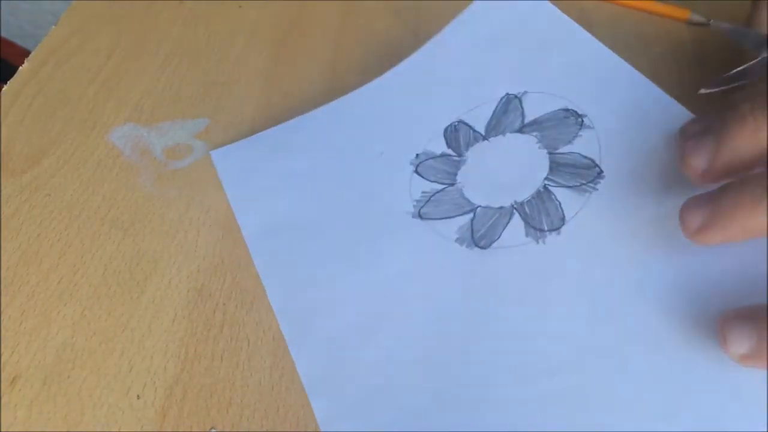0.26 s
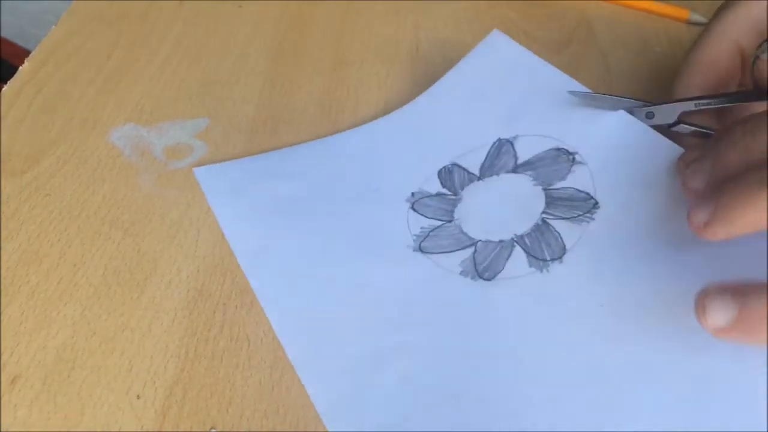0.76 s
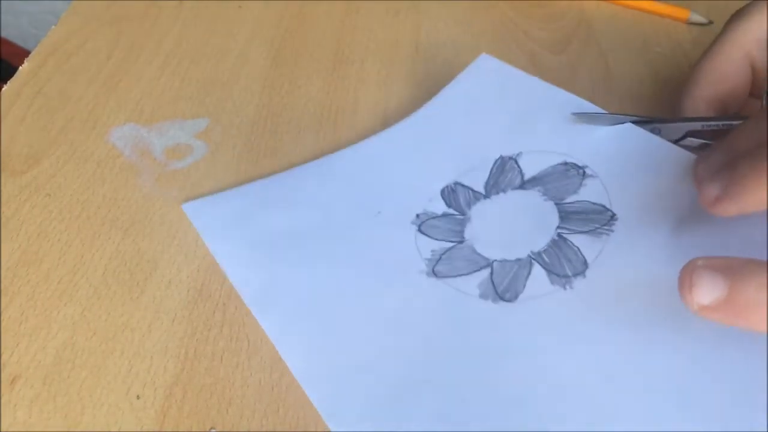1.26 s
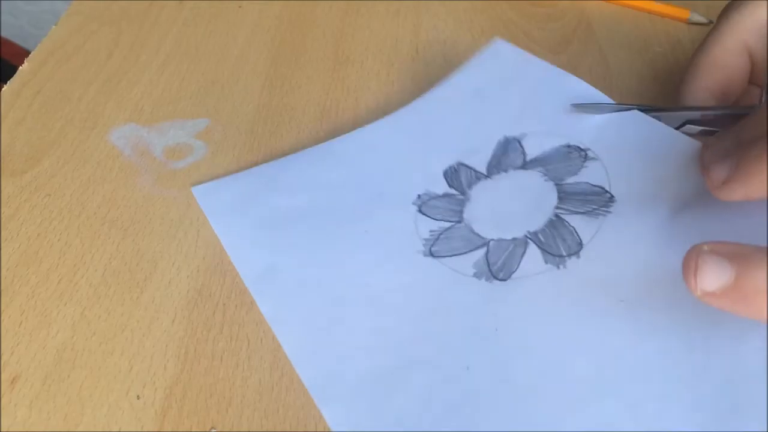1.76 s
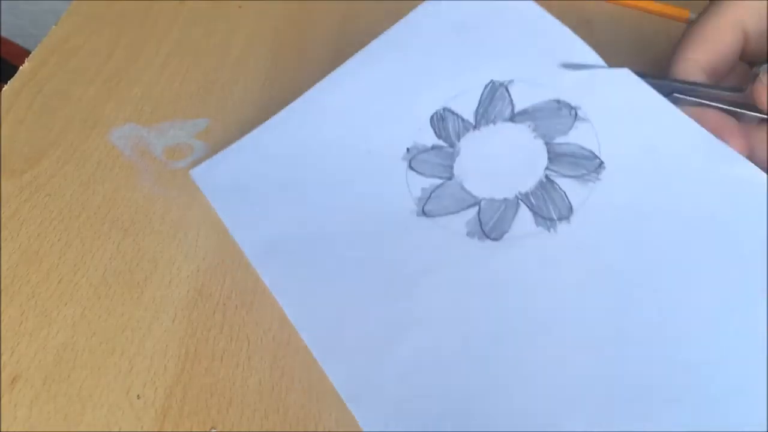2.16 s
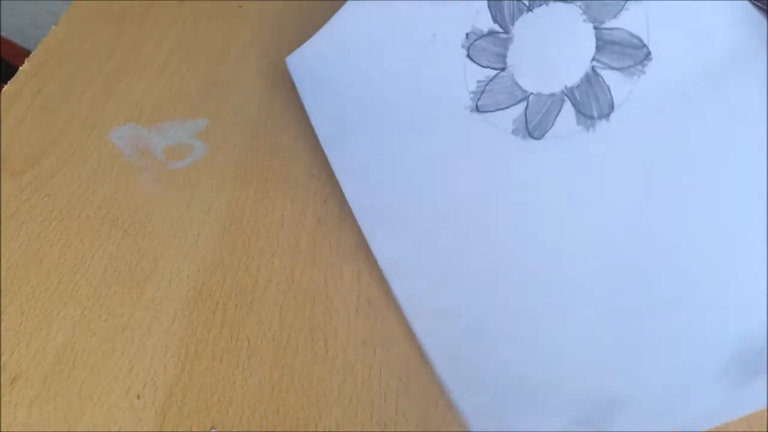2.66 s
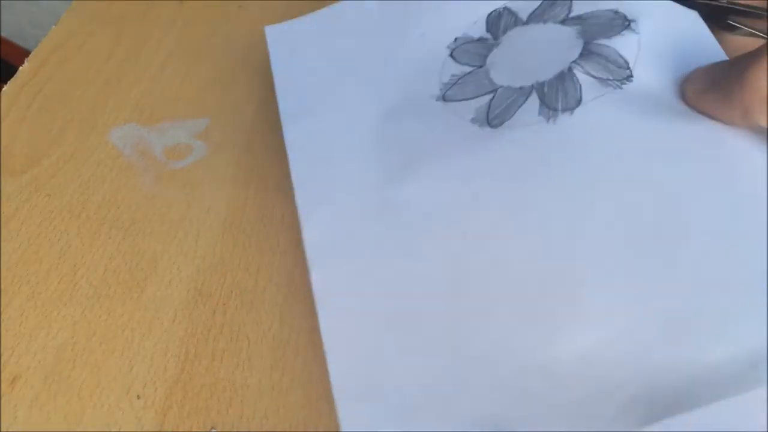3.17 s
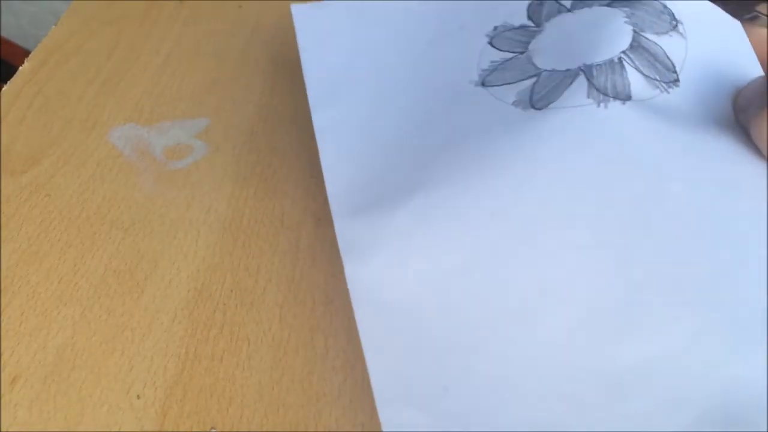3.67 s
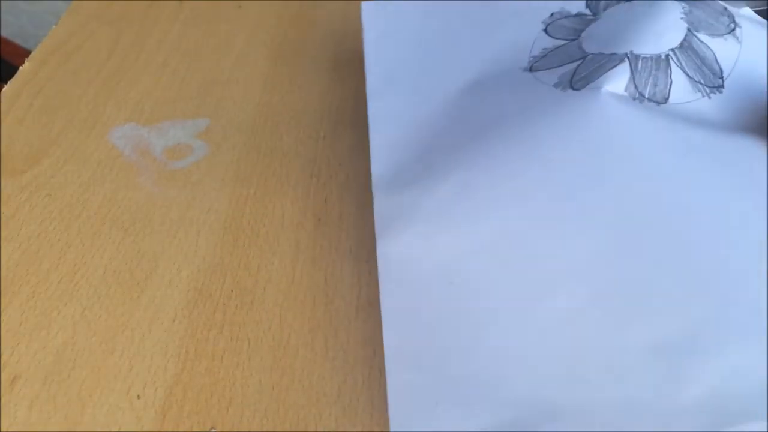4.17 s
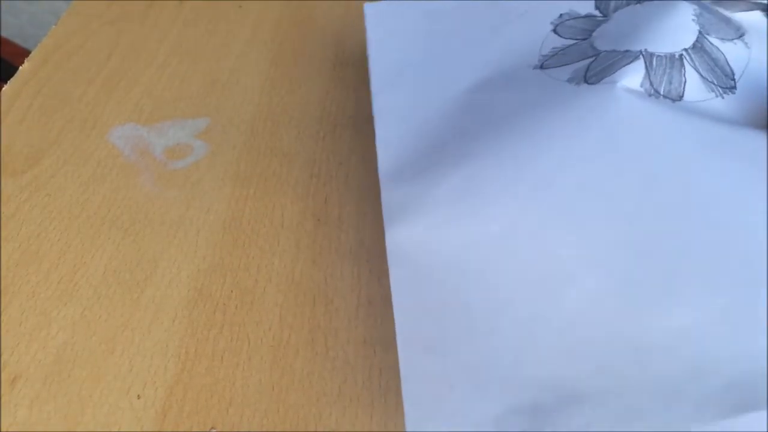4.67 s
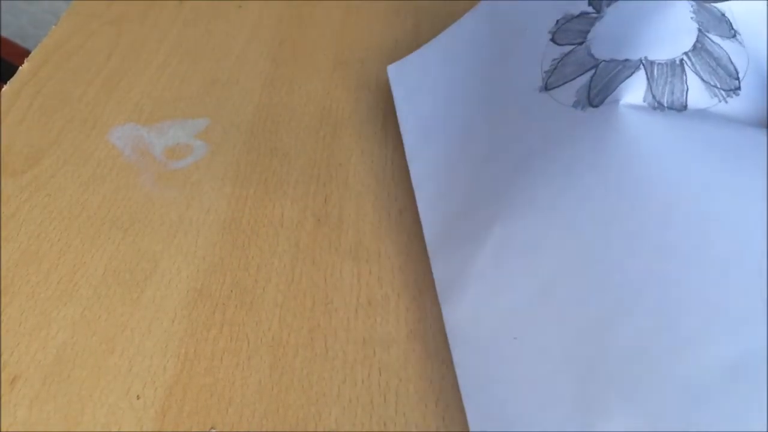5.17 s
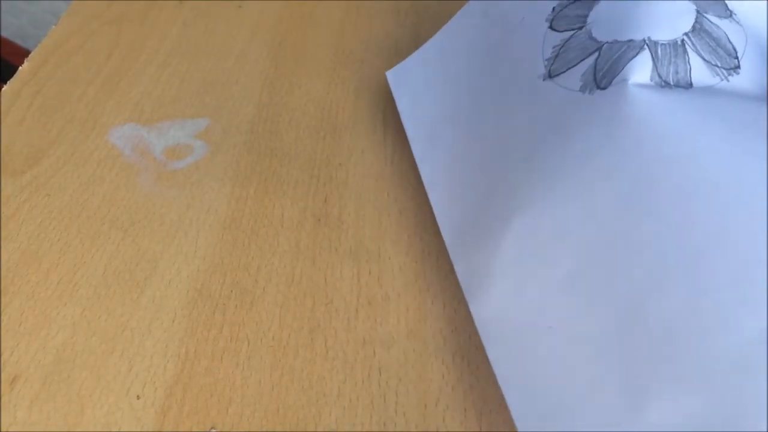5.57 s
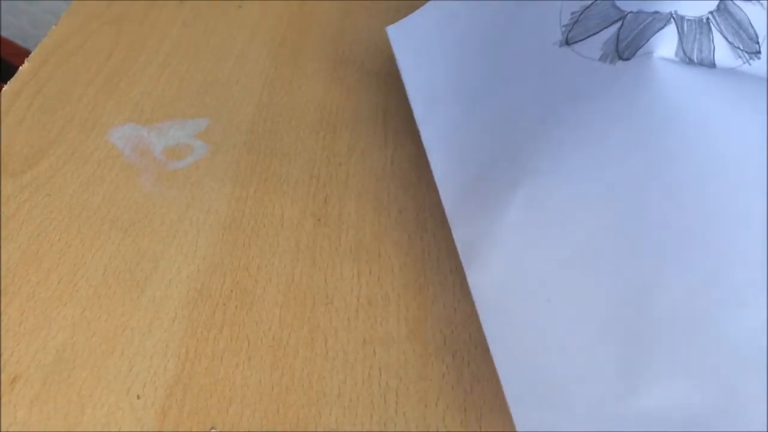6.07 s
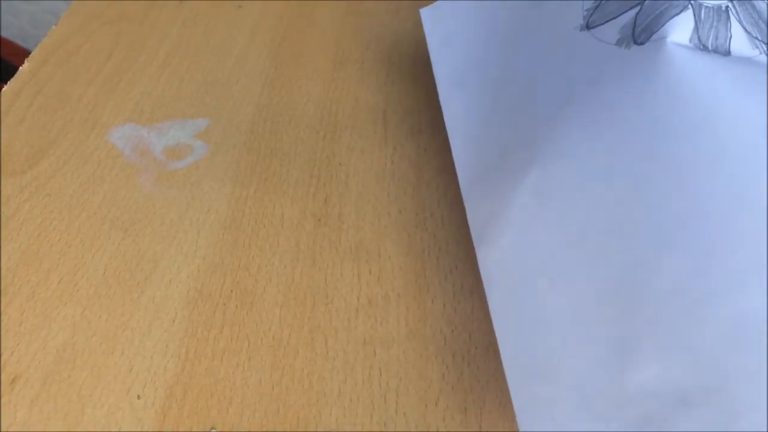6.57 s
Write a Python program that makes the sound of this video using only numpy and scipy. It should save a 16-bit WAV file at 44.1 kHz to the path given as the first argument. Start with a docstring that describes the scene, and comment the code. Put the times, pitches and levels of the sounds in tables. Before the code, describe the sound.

A short, very bright hiss of a sheet gliding into place lasts about 0.15 s, with a faint desk touch. From 0.5 to 1.5 s small scissors snip paper lightly: grainy tearing ticks, thin slides and small dry clicks, clearest near 0.6 and 1.2 s. More snips follow from 1.8 to 2.3 s, with a sharp click at 1.9 and a soft desk thud at 2.4. From 2.9 to 3.45 s the lifted sheet rustles fully and hisses, ending in a hard snap at 3.4. Irregular snips, crackles and scrapes then continue, busy from 4 to 4.7 s with knocks on the wood, and louder pops at 4.6, 5.15, 5.7 and 6.3 s. The last half second is quieter, with small snips and faint rustle. Close, dry phone pickup; short dull echo, faint midrange murmur of noise, low wavering room boom and weak air noise.

```python
"""A very bright hiss of a sheet gliding into place, then small scissors snip it close to a phone.
Fibres tear in dense ticks that ring the sheet; the sheet hisses and rustles as it drags over a wooden desk.
Cracks of sheet and blades are decaying noise in resonances; hands bump the desk, each push ringing its modes.
A short dull echo follows the paper sounds; a narrow band of noise murmurs faintly near 1.3 kHz.
Behind lie a low wavering boom and faint air noise."""
import sys
import numpy as np
from scipy import signal
from scipy.io import wavfile
from scipy.ndimage import uniform_filter1d

SR = 44100
rng = np.random.default_rng(int(sys.argv[2]) if len(sys.argv) > 2 else 0)


def generate_wav(sig):
    """Save sig (samples, or channels by samples) to the path in sys.argv[1] as 16-bit PCM at SR."""
    pcm = np.round(np.clip(np.atleast_2d(sig).T, -1, 1) * 32767).astype(np.int16)
    wavfile.write(sys.argv[1], SR, pcm)


N = 300321

# strokes of the blades, tugs at the sheet and short swelling cracks, levels ahead of the grip envelope:
# (time [s], length [s], tearing level [dB], sliding hiss level [dB])
STROKES = [(0.0, 0.054, -51, -75), (0.533, 0.053, -57.5, -58), (0.627, 0.06, -42.5, -54),
           (0.777, 0.026, -43.5, -75), (0.824, 0.12, -49, -50), (0.952, 0.012, -56, -41.5),
           (1.009, 0.08, -55.5, -53), (1.121, 0.037, -40, -43.5), (1.151, 0.11, -54, -50),
           (1.301, 0.031, -57, -54), (1.39, 0.078, -50.5, -59), (1.512, 0.019, -55, -48.5),
           (1.788, 0.053, -46.5, -52.5), (1.843, 0.093, -41.5, -46), (1.86, .018, -37, -42),
           (1.928, 0.054, -49, -56.5), (2.047, 0.01, -47, -56), (2.093, 0.015, -40, -42),
           (2.236, 0.021, -46, -62), (2.299, 0.027, -40.5, -41), (2.544, 0.014, -49.5, -63),
           (2.77, 0.082, -43.5, -44.5), (2.858, 0.03, -52, -101), (2.996, 0.055, -37.5, -53),
           (3.372, 0.0056, -18.5, -21.5), (3.444, 0.0061, -38, -32), (3.48, 0.077, -48.5, -60),
           (3.652, 0.075, -48, -52), (3.725, 0.053, -42, -47.5), (3.775, 0.072, -57, -48.5),
           (3.96, 0.049, -48, -58), (4.004, 0.051, -38, -56), (4.074, 0.014, -28.5, -32.5),
           (4.167, 0.066, -50, -44), (4.307, 0.055, -41, -44), (4.465, 0.037, -43, -37),
           (4.516, 0.038, -43, -44.5), (4.61, 0.08, -49, -59), (4.701, 0.11, -36.5, -49),
           (4.901, 0.081, -53, -49), (5.043, 0.049, -43.5, -55), (5.194, 0.022, -38.5, -33.5),
           (5.229, 0.041, -56, -49.5), (5.367, 0.025, -47.5, -58), (5.453, 0.081, -34.5, -43),
           (5.685, 0.04, -32, -37.5), (5.695, .007, -29, -31), (5.83, 0.0085, -34.5, -32),
           (5.843, 0.025, -48.5, -45.5), (5.929, 0.038, -53.5, -74), (5.998, 0.055, -32.5, -40.5),
           (6.029, .005, -27, -25), (6.164, 0.062, -47, -46), (6.259, .004, -36, -36),
           (6.41, 0.099, -56.5, -65), (6.527, 0.11, -55, -58.5), (6.697, 0.05, -51, -48.5),
           (6.729, .007, -33, -42)]
# sheet dragged over the desk under the fingers, mean levels: (time [s], rustle level [dB], sliding hiss level [dB])
DRAG = [(0, -86, -66), (.13, -66.5, -52.5), (.25, -61.5, -59.5), (.46, -65.5, -62), (.52, -69, -71.5),
        (.72, -60.5, -53.5), (1.1, -65, -68.5), (1.47, -62, -62), (2.1, -86, -68.5), (2.42, -67, -60),
        (2.929, -69, -67), (2.937, -48, -55), (3.06, -46.5, -45.5), (3.2, -46, -41), (3.33, -43.5, -41.5),
        (3.38, -44.5, -51), (3.441, -38.5, -83), (3.47, -64, -62), (3.62, -60.5, -61), (3.87, -67.5, -62),
        (3.92, -50.5, -51), (4.12, -57.5, -52.5), (4.28, -57, -57), (4.66, -59, -59.5),
        (4.85, -53.5, -52.5), (5.12, -58.5, -60), (5.29, -64.5, -75.5), (5.62, -58, -65), (6.1, -67, -65.5),
        (6.5, -63.5, -65.5), (6.66, -70.5, -68), (6.81, -59.5, -67)]
# modes of the sheet: (centre [Hz], nominal width [Hz], relative level [dB])
SHEET_MODES = [(932, 443, 4), (1374, 550, 6.5), (2447, 354, -0.5), (3576, 120, -1.5), (4115, 200, -3.5)]
# treble resonances of sliding and cracking: (centre [Hz], nominal width [Hz], relative level [dB])
HISS_MODES = [(3310, 1230, 0), (5600, 3060, 0), (7420, 2320, 2), (9770, 2000, -0.5), (12660, 6200, -7.5)]
# faint murmur that comes and goes: (time [s], mean level [dB])
MURMUR_LEVELS = [(.9, -97), (1.35, -67), (1.6, -83), (4.9, -75), (5.3, -65), (5.9, -73), (6.3, -91)]
# cracks of sheet and blades: (time [s], ring peak [dB], pitch [Hz], treble re ring [dB], t60 [s])
CRACKS = [(0.287, -39, 2780, 3, 0.015), (0.623, -26.5, 1660, -29, 0.027), (0.629, -29, 1350, -16, 0.015),
          (0.785, -36.5, 2740, -31, 0.021), (1.178, -33, 1300, 5.5, 0.02), (1.192, -27.5, 1310, -20, 0.018),
          (1.879, -23.5, 2620, -10, 0.011), (2.063, -36.5, 2320, -3, 0.015), (2.27, -36, 2400, -8, 0.024),
          (2.473, -29, 2320, 2, 0.009), (2.785, -32.5, 1800, -19, 0.022), (2.81, -31, 1980, 2, 0.035),
          (3.047, -28, 1500, -6, 0.05), (3.246, -24.5, 1600, -20, 0.023), (3.276, -20.5, 1470, -5, 0.021),
          (3.386, -16.5, 1540, -19, 0.024), (3.407, -25, 1800, -22, .024), (3.531, -32.5, 1770, 4, 0.013),
          (3.711, -34, 1550, -6, 0.024), (3.956, -41, 2500, 9, .014), (3.989, -27, 2630, -16, 0.014),
          (3.999, -24.5, 1600, -24, 0.021), (4.11, -32, 1040, -8, 0.024), (4.25, -43, 2300, 3, .009),
          (4.261, -30, 2250, 6, 0.015), (4.301, -36, 3000, -4, 0.014), (4.334, -24, 2300, -21, 0.012),
          (4.357, -29, 2290, -1, 0.022), (4.473, -29, 2670, 4, 0.017), (4.481, -32, 2660, 13.5, 0.012),
          (4.491, -37, 2600, 6, .016), (4.545, -30, 990, -11, 0.024), (4.602, -17.5, 2180, -36, 0.018),
          (4.968, -24, 6300, -2.5, 0.019), (5.098, -22, 1260, -22, 0.032), (5.108, -31, 1720, -20, 0.0085),
          (5.165, -17.5, 1920, -40, 0.016), (5.201, -29, 2320, -18, 0.02), (5.472, -32, 2110, 6, .008),
          (5.711, -13, 2180, -26, 0.015), (5.727, -26, 1050, 7.5, 0.014),
          (5.842, -31.5, 1100, 14.5, 0.0042), (6.128, -36, 2800, -4, 0.03), (6.25, -29, 3460, -21, 0.017),
          (6.299, -15, 2180, -10, 0.011), (6.611, -39, 2500, -3, 0.011), (6.709, -29.5, 2740, -17, 0.017), ]
# bumps on the desk: (time [s], peak [dB], push length [s])
BUMPS = [(0.019, -48, 0.0029), (0.288, -48, 0.0011), (.67, -43.5, 0.0025), (.878, -48.5, 0.0023),
         (.908, -50, .0018), (1.348, -51, 0.0084), (2.391, -38.5, 0.01), (2.798, -44, 0.0047),
         (3.051, -40, 0.0033), (3.095, -39, 0.0079), (3.376, -40.5, 0.0076), (4.081, -43.5, 0.0015),
         (4.25, -54, 0.004), (4.42, -44.5, 0.0016), (4.534, -40, 0.00083), (4.602, -35.5, 0.00093),
         (4.643, -40, 0.0022), (4.74, -50, 0.0012), (5.099, -38, 0.0025), (5.225, -33, 0.001)]
# modes of the desk top: (centre [Hz], width [Hz], relative level [dB])
DESK_MODES = [(80, 16.5, -7), (135, 15, -4), (190, 67, -6), (343, 47, 0), (530, 73, 2), (1010, 490, -4)]
# booming of the room: (centre [Hz], nominal width [Hz], relative mean level [dB])
HUM_MODES = [(83.3, 56, 2), (123, 51, -3.5), (182, 53, 4.5), (285.6, 41, -2)]
# air noise spectrum: (frequency [Hz], relative density [dB per Hz])
AIR_SPECTRUM = [(240, -35), (400, 27.5), (865, -28), (2510, 17), (7280, -9), (14800, -47)]

TURN_S = 2.3, 5.3  # sheet is lifted and turned between these: flat, lifted, curled
THIN_HZ = 1020, 590, 690  # low cutoff of the sheet's radiation: flat, lifted, curled
FOLD_HZ, FOLD_OCT_PER_DB = (3200, 2170, 2320), 0.012  # tearing pitch: flat, lifted, curled; rises if hissy
BELLY_DB, BELLY_DB_PER_DB = (-5, -5, 4), -0.5  # share of sheet modes: flat, lifted, curled; falls if hissy
FLAP_DB, LIFTED_FLAP_DB = -14, -8.5  # re the other rustle
MURMUR_HZ, MURMUR_WIDTH_HZ = 1326, 89  # nominal width
SWISH_END_S, SWISH_HZ, SWISH_WIDTH_HZ, SWISH_DB = 0.11, 9050, 8100, -47
ECHO_DB, ECHO_T60_S = -17, 0.1
HUM_DB, AIR_DB = -64.5, -69
TOP_HZ = 15600


def undb(db):
    """Level in dB to amplitude."""
    return 10 ** (np.asarray(db) / 20)


def unit(x):
    """Scale to RMS 1."""
    return x / np.sqrt(np.mean(x ** 2))


def band(x, hz, width_hz):
    """Two-pole resonance, gain 1 at the centre."""
    hz = np.clip(hz, 20, .45 * SR)
    return signal.lfilter(*signal.iirpeak(hz, hz / max(width_hz, 10), fs=SR), x)


def band_twice(x, hz, width_hz):
    """Two equal resonances in series, for steeper skirts."""
    return band(band(x, hz, width_hz), hz, width_hz)


def body(x, modes):
    """Parallel resonances of alternating sign."""
    return sum((-1) ** k * undb(db) * band(x, hz, w) for k, (hz, w, db) in enumerate(modes))


def thin(x, hz):
    """Third-order high-pass: weak radiation below this pitch."""
    return signal.sosfilt(signal.butter(3, hz, "high", fs=SR, output="sos"), x)


def walk(rate_hz):
    """Random levels held 1 / rate_hz and slewed twice; RMS near 1."""
    hold = int(SR / rate_hz)
    steps = np.repeat(rng.standard_normal(N // hold + 1), hold)
    return unit(uniform_filter1d(uniform_filter1d(steps, hold), hold)[:N])


def ticks(rate_hz, spread_db):
    """Random clicks of either sign, a few much larger than the rest."""
    when, sign = rng.random(N), rng.standard_normal(N)
    size = np.minimum(rng.exponential(size=N), 4)
    return (when < rate_hz / SR) * sign * undb(spread_db * size)


def add(out, x, s):
    """Mix x into out from time s [s]."""
    i = int(s * SR)
    out[i:i + len(x)] += x[:N - i]


def shifting(x, modes, depth_db, rate_hz):
    """Resonances that swell and sink apart as the sheet changes shape."""
    out = 0
    for k, (hz, w, db) in enumerate(modes):
        level = undb(db + depth_db * walk(rate_hz))
        out = out + (-1) ** k * level * band_twice(x, hz, 2 * w)
    return unit(out)


def strokes(tear, sheet, slide, flap):
    """Strokes, tugs and short cracks swell, hold and let go; sheet state and hiss set the tearing pitch."""
    out = np.zeros(N)
    for s, length_s, tear_db, slide_db in STROKES:
        i = int(s * SR)
        t = np.arange(min(int(length_s * SR) + SR // 4, N - i)) / SR
        span = slice(i, i + len(t))
        swell = np.sin(np.pi / 2 * np.minimum(t / (0.0034 + 0.51 * length_s), 1))
        past = np.maximum(t - 0.86 * length_s, 0)
        release = 0.67 * np.exp(-past / (0.004 + 0.056 * length_s))
        trail = 0.026 * min(length_s / 0.053, 1) * np.exp(-past / 0.015)
        grip = swell * (release + trail)

        state = np.searchsorted(TURN_S, s)
        hissy_db = slide_db - tear_db
        hz = FOLD_HZ[state] * 2 ** (FOLD_OCT_PER_DB * hissy_db)
        belly_db = BELLY_DB[state] + BELLY_DB_PER_DB * np.clip(hissy_db, -15, 10)
        fold = unit(band_twice(tear[span], hz, 0.67 * hz)) + undb(belly_db) * sheet[span]
        torn = unit(thin(fold, THIN_HZ[state])) + undb(-10.5) * flap[span]
        add(out, grip * (undb(tear_db) * torn + undb(slide_db) * unit(slide[span])), s)
    return out


def tearing():
    """Fibres break in uneven runs of ticks."""
    return unit(ticks(5500, 2.5) * undb(2.2 * walk(130)))


def sliding():
    """The grain of the desk catches the sheet unevenly and excites its treble."""
    scratch = ticks(12000, 2.6) * undb(2 * walk(120))
    return shifting(scratch, HISS_MODES, 2.2, 35)


def flapping(clock_s):
    """Slow bends of the sheet give a dull, lumpy rustle, stronger while it is lifted."""
    lifted = (clock_s > TURN_S[0]) & (clock_s < TURN_S[1])
    bends = band_twice(ticks(250, 3.4), 380, 430) * undb(5.2 * walk(22.13))
    return unit(bends) * undb(np.where(lifted, LIFTED_FLAP_DB, FLAP_DB))


def drag(clock_s, tear, sheet, slide, flap):
    """Rustle and sliding hiss follow the drag levels, each wavering on its own."""
    when, rustle_db, hiss_db = np.transpose(DRAG)
    rustle = unit(band(tear, 2770, 2160) + undb(-3.5) * sheet) + flap
    out = undb(np.interp(clock_s, when, rustle_db) + 0.99 * walk(17)) * rustle
    return out + undb(np.interp(clock_s, when, hiss_db) + 2 * walk(26.86)) * slide


def swish(clock_s):
    """The sheet glides into place: dense ticks in a broad treble band, then a quick fade."""
    glide = np.exp(-np.maximum(clock_s - SWISH_END_S, 0) / 0.044)
    return undb(SWISH_DB) * glide * unit(band(ticks(10000, 1.9), SWISH_HZ, SWISH_WIDTH_HZ))


def murmur(clock_s):
    """Narrow band of noise near 1.3 kHz that comes and goes."""
    noise = unit(band_twice(rng.standard_normal(N), MURMUR_HZ, MURMUR_WIDTH_HZ))
    return undb(np.interp(clock_s, *np.transpose(MURMUR_LEVELS)) + 2 * walk(14)) * noise


def paper(clock_s):
    """Strokes, drag and swish; strokes and drag share the same torn and sliding sheet."""
    tear, slide = tearing(), sliding()
    sheet = shifting(tear, SHEET_MODES, 3, 35)
    flap = flapping(clock_s)
    out = strokes(tear, sheet, slide, flap) + drag(clock_s, tear, sheet, slide, flap)
    return out + swish(clock_s)


def cracks():
    """One sharp buckle and a dying spray of noise at its pitch, in the sheet's modes and in the treble."""
    out, t = np.zeros(N), np.arange(8192) / SR
    for s, db, hz, crisp_db, t60_s in CRACKS:
        t60_s = max(t60_s, .004)
        # longer cracks build up more slowly
        rise = (1 - np.exp(-t / (t60_s * np.array([[.1], [.1], [.12]])))) ** 2
        spray = rng.standard_normal((3, len(t))) * rise * 1000. ** (-t / t60_s)
        # the buckle stands out only in short cracks
        spray[:, 40] += np.array([4.5, 3.5, 2.2]) * min(0.016 / t60_s, 1.5) ** 2
        ring = band(spray[0], hz, 0.32 * hz) + undb(-9.0) * body(spray[1], SHEET_MODES)
        ring = thin(ring, THIN_HZ[np.searchsorted(TURN_S, s)])
        crisp = body(spray[2], HISS_MODES)
        crack = ring / np.abs(ring).max() + undb(crisp_db) * crisp / np.abs(crisp).max()
        add(out, undb(db) * crack, s)
    return out


def bumps():
    """A push rings the desk top; the shorter the push, the higher the modes it moves."""
    out, t = np.zeros(N), np.arange(16384) / SR
    for s, db, push_s in BUMPS:
        push_s = max(push_s, 2e-4)
        push = np.sin(np.pi * np.clip(t / push_s, 0, 1)) ** 2
        ring = thin(body(push, DESK_MODES), 0.12 / push_s)
        add(out, undb(db) * ring / np.abs(ring).max(), s)
    return out


def echo(near):
    """Desk and walls return a short, dull tail: decaying band noise after 3 ms."""
    t = np.arange(SR // 2) / SR
    tail = band(rng.standard_normal(len(t)), 900, 1870) * 1000. ** (-t / ECHO_T60_S) * (t > .003)
    return undb(ECHO_DB) * signal.fftconvolve(near, tail / np.sqrt(np.sum(tail ** 2)))[:N]


def boom():
    """Low resonances of the room, wavering apart."""
    hum = 0
    for hz, w, db in HUM_MODES:
        hum = hum + undb(db + 1.87 * walk(6)) * unit(band_twice(rng.standard_normal(N), hz, w))
    return unit(hum) * undb(HUM_DB)


def air_noise():
    """Faint wavering noise in half-octave steps."""
    hz, db = np.transpose(AIR_SPECTRUM)
    air = 0
    for f in 400 * 2 ** np.arange(0, 5.6, .5):
        # density to band level
        gain_db = np.interp(np.log(f), np.log(hz), db) + 10 * np.log10(f) + 4.0 * walk(3.42)
        air = air + undb(gain_db) * unit(band(rng.standard_normal(N), f, f / 2))
    return unit(air) * undb(AIR_DB)


def scene():
    """Paper, cracks and murmur with their echo, desk bumps, room."""
    clock_s = np.arange(N) / SR
    near = paper(clock_s) + cracks() + murmur(clock_s)
    return (near + echo(near) + bumps() + boom() + air_noise())[None]


def record(dry):
    """The phone cuts the top: steep low-pass."""
    return signal.sosfilt(signal.ellip(10, .2, 70, TOP_HZ, fs=SR, output="sos"), dry)


dry = scene()
out = record(dry)
generate_wav(out)
```